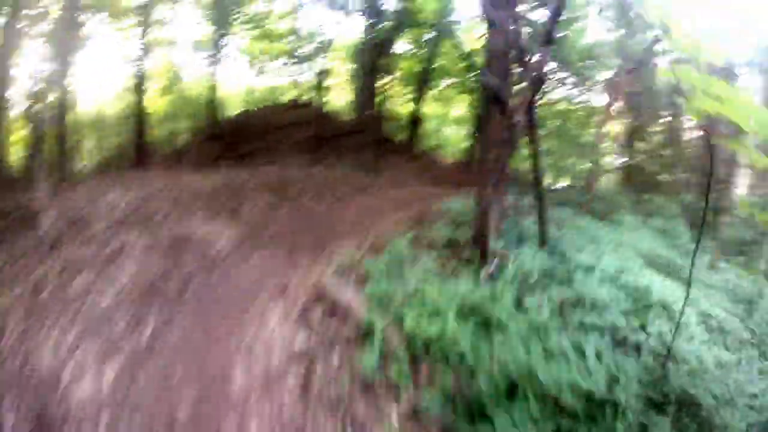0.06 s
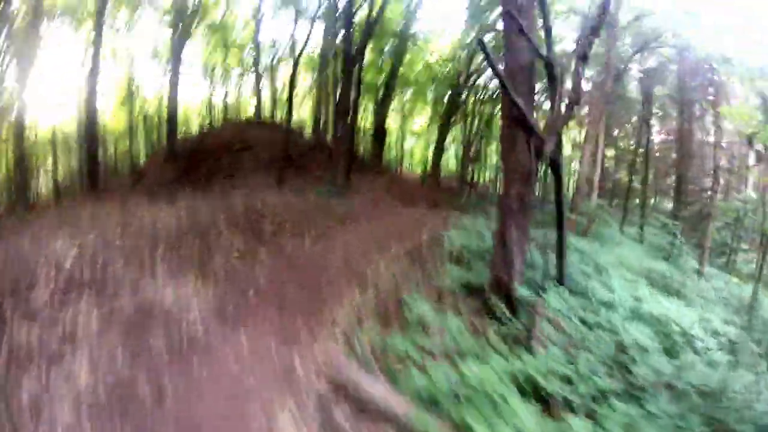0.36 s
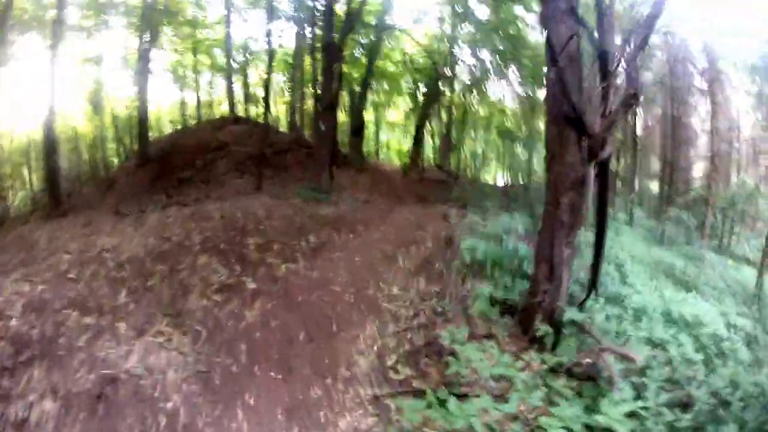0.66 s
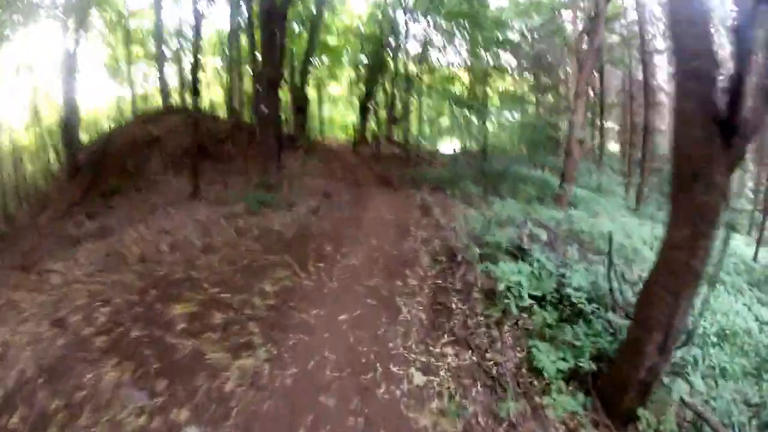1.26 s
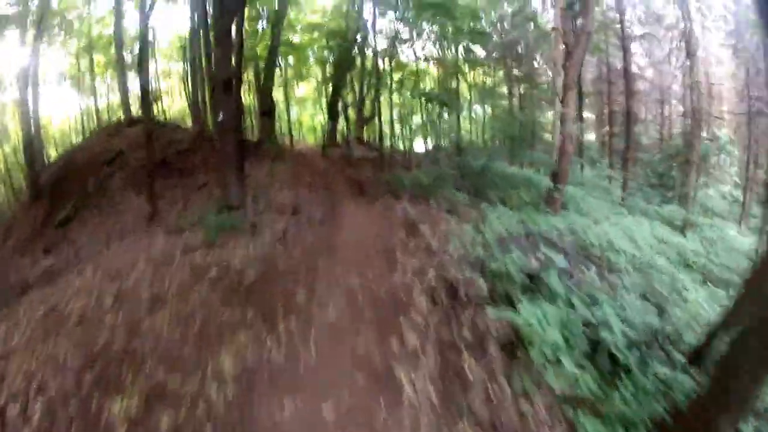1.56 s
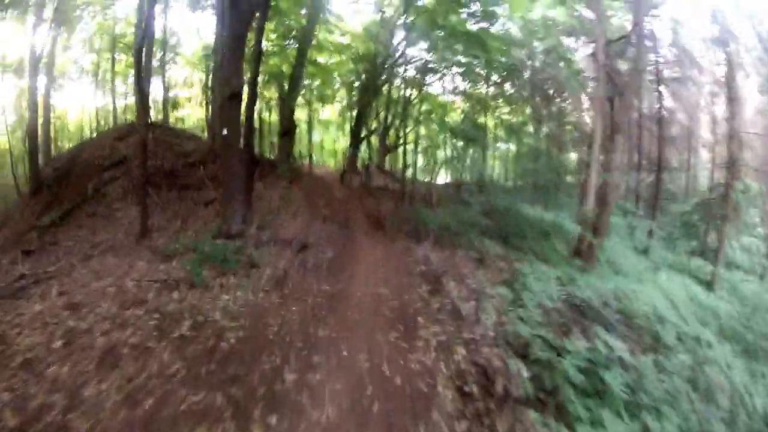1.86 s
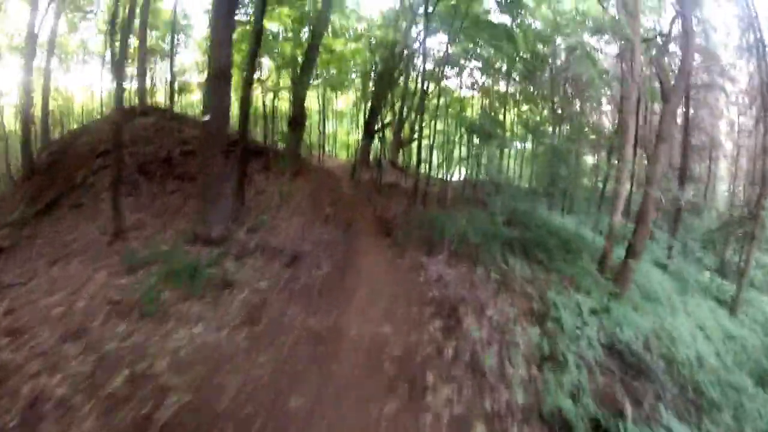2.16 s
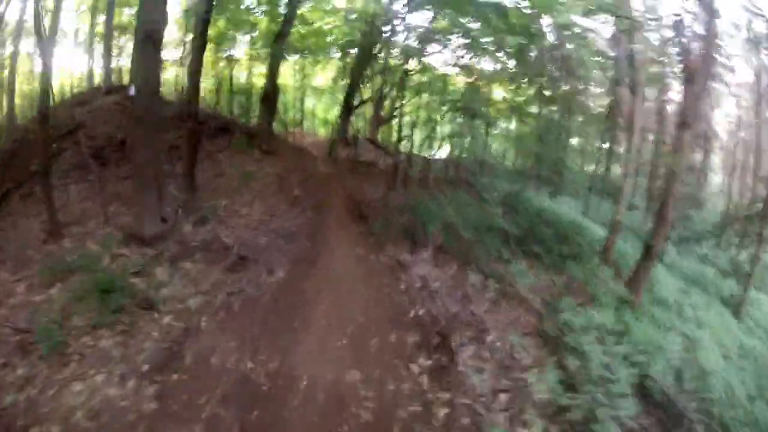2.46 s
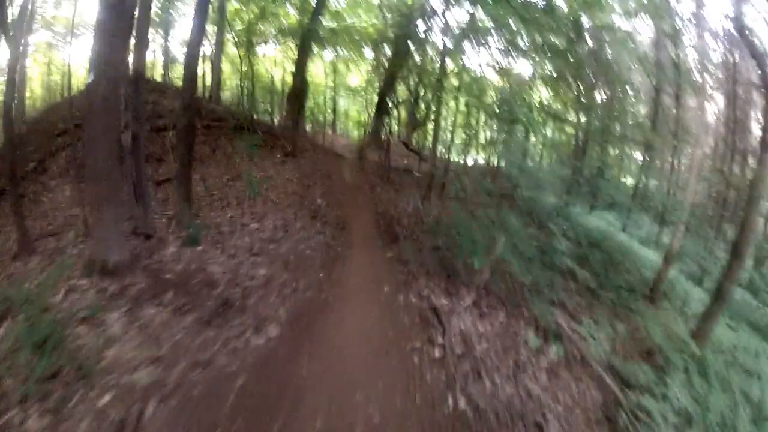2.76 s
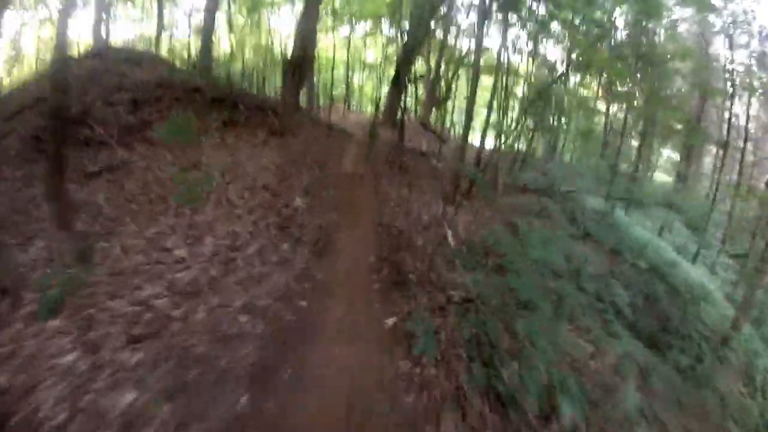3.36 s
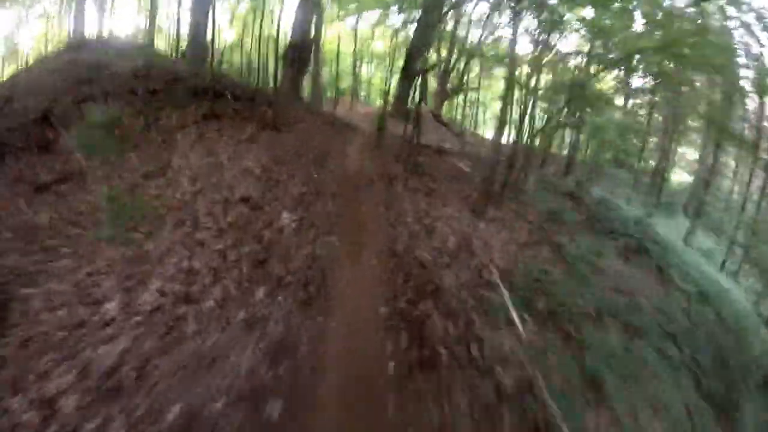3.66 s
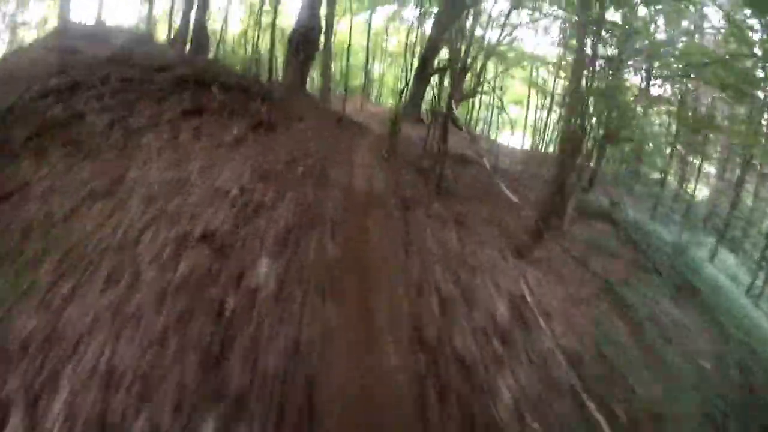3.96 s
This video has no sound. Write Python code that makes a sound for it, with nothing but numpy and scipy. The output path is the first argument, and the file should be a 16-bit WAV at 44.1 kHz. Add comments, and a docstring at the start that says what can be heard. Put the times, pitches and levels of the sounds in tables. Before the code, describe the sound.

Mountain bike rolling down a dirt trail, with wind rumble, crunching tyres and chain rattle.

```python
"""Wind buffets the microphone over a bed of tyre roar: a mountain bike gathering speed down a dirt
forest trail, heard from a camera on the rider. The tyres crunch soil and leaves, slip on grit and snap
twigs, and dull bumps come up through the mount. On top, the slack chain chatters in short bursts and
knocks make the frame clack. The camera's coarse sampling adds a glassy top."""
import sys
import numpy as np
from scipy import signal
from scipy.fft import rfft, irfft
from scipy.io import wavfile

SR = 44100
rng = np.random.default_rng(int(sys.argv[2]) if len(sys.argv) > 2 else 0)


def materialize(psi):
    """Save the field psi as 16-bit PCM at rate SR to the path in sys.argv[1].

    A 1-D psi becomes a single channel; in a 2-D psi each row is a channel.
    """
    bounded = np.clip(np.atleast_2d(psi).T, -1, 1)
    quanta = np.round(bounded * 32767).astype(np.int16)
    wavfile.write(sys.argv[1], SR, quanta)


N = 176400
T = np.arange(N) / SR

# fader ride of the wind on the microphone: t/s, level/dB
WIND_RIDE = [(0.0, -42.5), (0.18, -44), (0.26, -40), (0.32, -48), (0.72, -44), (1.08, -45.5), (1.3, -38),
             (1.35, -48), (1.41, -35.5), (1.46, -47.5), (1.96, -36), (2.12, -43.5), (2.49, -37.5),
             (2.53, -32), (2.75, -46.5), (2.8, -32.5), (2.92, -36.5), (3.2, -34.5), (3.29, -23.5),
             (3.32, -43), (3.34, -30), (3.49, -34), (3.61, -26.5), (3.73, -28.5), (3.97, -24), (4.0, -40)]
# EQ of the wind rumble: f/Hz, level/dB
WIND_EQ = [(15, -14), (25, -1.5), (38, 2.5), (85, 1.5), (130, -1.5), (200, -5.5), (300, -12.5), (450, -22),
           (700, -32), (1000, -67.5), (2000, -59)]
# dull bumps through the rider's mount: t/s, level/dB
MOUNT_BUMPS = [(.062, -36), (.704, -28.5), (2.548, -21), (2.648, -27), (3.274, -29), (3.336, -30),
               (3.606, -26)]
# low body of a bump: f/Hz, level/dB, t60/s
MOUNT_MODES = [(89, -1.5, 0.093), (151, -4.5, 0.018), (254, -3, 0.024)]
# fader ride of the tyre roar: t/s, level/dB
ROAR_RIDE = [(0.0, -53), (0.27, -52), (0.31, -60.5), (0.39, -52.5), (0.68, -52.5), (0.73, -49.5),
             (1.38, -53), (3.63, -44.5), (3.9, -41), (4.0, -46)]
# EQ of tread on packed soil: f/Hz, level/dB
ROAR_EQ = [(100, -14), (300, 0.5), (450, -1.5), (620, 1.5), (720, -4), (850, -11), (1000, -20), (1500, -27),
           (3000, -61)]
# fader ride of soil and leaves under the tyres: t/s, level/dB
CRUNCH_RIDE = [(0, -66), (.22, -62.5), (.33, -62.5), (.7, -66.5), (.77, -59.5), (1.1, -68), (1.45, -62),
               (1.78, -66), (2.03, -59), (2.15, -63.5), (2.72, -58), (3.0, -59.5), (3.24, -59), (3.42, -61),
               (3.49, -57), (3.73, -52.5), (4, -60)]
# EQ of the crunch: f/Hz, level/dB
CRUNCH_EQ = [(400, -3), (1000, 1.5), (1700, -1), (2250, -0.5), (2700, 0), (3200, 1), (3800, -3),
             (4700, -5.5), (5800, -10.5)]
# metal parts shaken by rough ground: f/Hz, level/dB, t60/s
METAL_MODES = [(2185, -1.5, 0.038), (2363, 2, 0.022), (3290, -4, 0.049)]
# stones and twigs snapping: t/s, level/dB
SNAP_HITS = [(2.363, -40.5), (2.657, -53), (2.892, -43), (2.954, -58), (3.104, -39.5), (3.735, -38)]
# EQ of a snap: f/Hz, level/dB
SNAP_EQ = [(300, -16), (800, 11.5), (1400, -2), (2300, -4), (4000, -22), (6000, -22)]
# tyre slips on grit, cued at their peaks: t/s, level/dB, half length/s
SLIPS = [(0.256, -55.5, 0.019), (0.425, -56, 0.023), (3.681, -45, 0.01)]
# EQ of a slip: f/Hz, level/dB
SLIP_EQ = [(800, -9), (1700, -0.5), (2500, 4.5), (3300, -2.5), (4400, -3.5), (5800, -12)]
# bursts of chain chatter: t/s, level/dB, length/s
CHAIN_BURSTS = [(.062, -47, 0.0066), (.166, -53, .003), (.243, -45.5, 0.023), (.420, -44.5, 0.0048),
                (.482, -49, 0.0025), (.560, -57, 0.0029), (.636, -52, .003), (.665, -50.5, .003),
                (.733, -45, 0.0092), (1.183, -52.5, .01), (1.231, -43.5, 0.0055), (1.280, -36.5, 0.0021),
                (1.2867, -45.5, 0.0051), (1.659, -46.5, .007), (1.698, -40, 0.018), (1.840, -46.5, .004),
                (1.851, -61, .01), (1.875, -45, 0.012), (1.967, -45, 0.0063), (1.986, -45, 0.005),
                (1.997, -45, 0.012), (2.206, -40, 0.0067), (2.302, -43, .029), (2.503, -41, 0.007),
                (2.567, -32.5, 0.006), (2.574, -37.5, 0.021), (2.798, -40.5, 0.016), (2.870, -41, 0.026),
                (3.092, -36, 0.01), (3.134, -37.5, 0.027), (3.211, -46, 0.0068), (3.220, -41, 0.011),
                (3.294, -40, 0.0052), (3.330, -37.5, .018), (3.514, -33.5, 0.013), (3.574, -44, 0.013),
                (3.587, -43.5, 0.0072), (3.631, -32.5, 0.014), (3.807, -40, 0.0095), (3.859, -40, .006),
                (3.866, -39.5, 0.0091), (3.919, -34.5, 0.012)]
# ring of the chain links: f/Hz, level/dB, t60/s
LINK_MODES = [(2840, -2.5, 0.0024), (3300, -16, 0.0035), (3907, -4, 0.017), (4635, 3, 0.0044),
              (5160, -4, 0.0033)]
# knocks in the frame: t/s, level/dB, low-pass f/Hz
FRAME_KNOCKS = [(.370, -45, 2000), (.724, -43.5, 1900), (0.771, -43.5, 1890), (2.461, -32, 2860),
                (2.5534, -17.5, 5000), (3.243, -41, 2300), (3.477, -46, 4000), (3.671, -54, 4500),
                (3.751, -36, 4030)]
# ring of the frame: f/Hz, level/dB, t60/s
CLACK_MODES = [(1300, -24.5, 0.031), (2050, 0.5, 0.012), (2776, 1.5, 0.011), (3680, -12.5, 0.027),
               (5150, -5, 0.0066)]

WIND_TRIM_DB, ROAR_TRIM_DB, CHAIN_TRIM_DB, CLACK_TRIM_DB = 0.11, 1.5, -1, 3.5
GUST_DB, GUSTS_PER_S = 1.35, 50
BRIGHT_HZ, BRIGHT_PER_DB, WIND_REF_DB = 108, 0.115, -45.5  # high shelf that follows the wind's strength
GRAINS_PER_S, GRAIN_SPREAD_DB, GRAIN_DB, HISS_DB, TINGLE_DB = 1500, 3, -4, -1.5, -73
CHAIN_REBOUND_DB, CHAIN_VARY_DB = -1.5, 1.5
FRAME_REBOUND_S, FRAME_REBOUND_DB = .0048, -7
FRAME_LOW_HZ, CHAIN_LOW_HZ = 1200, 1920  # small parts radiate little below these
SHIMMER_HZ, SHIMMER_WIDTH_HZ, SHIMMER_T60_S, SHIMMER_DB = 2990, 260, 0.5, -28
MIC_LOW_HZ, CEILING_DB, INPUT_EDGE_HZ, HOLD_HZ, TOP_HZ = 30.6, -14.5, 5520, 12000, 15350


def undb(db):
    """Decibels to gain."""
    return 10 ** (np.asarray(db) / 20)


def unit(x):
    """Scale to rms 1."""
    return x / np.sqrt(np.mean(x ** 2))


def curve(rows):
    """Join (time, value) breakpoints with straight ramps."""
    return np.interp(T, *np.array(rows).T)


def cut(x, hz, kind, order=2):
    """Low-pass or high-pass."""
    return signal.sosfilt(signal.butter(order, hz, kind, fs=SR, output="sos"), x)


def colour(x, eq):
    """Shape a sound with an EQ curve, at rms 1."""
    hz, db = np.array(eq).T
    f = np.maximum(np.fft.rfftfreq(N, 1 / SR), 1)
    gain = undb(np.interp(np.log(f), np.log(hz), db))
    return unit(irfft(rfft(x) * gain, N))


def noise(eq):
    """White noise through an EQ curve."""
    return colour(rng.standard_normal(N), eq)


def wobble(per_s):
    """Random modulator at rms 1, ramping to a new value per_s times a second."""
    knots = rng.standard_normal(2048)
    return unit(np.interp(T * per_s, np.arange(len(knots)), knots))


def ring(x, modes, rise_s=1 / SR):
    """Strike a body of decaying modes; rise_s softens the attack as the blow spreads."""
    t = T[:SR // 4]
    body = sum(undb(db - 60 * t / t60) * np.sin(2 * np.pi * hz * t) for hz, db, t60 in modes)
    return signal.fftconvolve(x, body * (1 - np.exp(-t / rise_s)))[:N]


def blows(cues):
    """One impulse per cue, at its time and level."""
    out = np.zeros(N)
    for start, db, *_ in cues:
        out[int(np.clip(start * SR, 0, N - 1))] += undb(db)
    return out


def rebounds(bursts, gap_s, fall_db, scatter_db):
    """After each blow a loose part bounces unevenly, weaker and weaker, until it settles."""
    out = np.zeros(N)
    for start, db, length in bursts:
        timing, polarity, force = rng.standard_normal((3, 40))
        delay = np.cumsum(gap_s * np.exp(timing / 2))
        settle = np.clip((length - delay) / gap_s + 1, 0, 1)
        level_db = db - fall_db * delay / length + scatter_db * np.tanh(force)
        at = np.clip((start + delay) * SR, 0, N - 1).astype(int)
        np.add.at(out, at, settle * np.sign(polarity) * undb(level_db))
    return out


def wind():
    """Eddies on the microphone: a fluttering rumble that opens up as it gets stronger."""
    strength_db = curve(WIND_RIDE)
    air = noise(WIND_EQ) * unit(undb(GUST_DB * wobble(GUSTS_PER_S)))
    low = signal.sosfiltfilt(signal.butter(2, BRIGHT_HZ, fs=SR, output="sos"), air)
    shelf = undb(BRIGHT_PER_DB * (strength_db - WIND_REF_DB))
    return (low + (air - low) * shelf) * undb(strength_db + WIND_TRIM_DB)


def bumps():
    """Jolts come through the rider's mount as low thuds."""
    return ring(blows(MOUNT_BUMPS), MOUNT_MODES)


def tyres():
    """Tread roars on packed soil and crushes grit and leaves; the grains set metal parts tingling."""
    roar = noise(ROAR_EQ) * undb(curve(ROAR_RIDE) + ROAR_TRIM_DB)
    clicks = (rng.random(N) < GRAINS_PER_S / SR) * rng.choice([-1, 1], N)
    grains = clicks * undb(GRAIN_SPREAD_DB * np.minimum(rng.exponential(size=N), 5))
    crunch = undb(GRAIN_DB) * colour(grains, CRUNCH_EQ) + undb(HISS_DB) * noise(CRUNCH_EQ)
    crunch_db = curve(CRUNCH_RIDE) + 1.06 * wobble(per_s=22.11)
    tingle = unit(cut(ring(grains, METAL_MODES), FRAME_LOW_HZ, "high"))
    return roar + undb(crunch_db) * crunch + undb(TINGLE_DB) * tingle


def snaps(t60_s=0.029):
    """Stones and twigs snap under a tyre: noise with a hard attack and a tight tail."""
    tail = undb(-60 * T[:SR // 4] / t60_s)
    return signal.fftconvolve(blows(SNAP_HITS), tail)[:N] * noise(SNAP_EQ)


def slips():
    """Short gritty swells where a tyre loses grip."""
    swells = sum(undb(db) * np.exp(-((T - peak) / half) ** 2) for peak, db, half in SLIPS)
    return swells * noise(SLIP_EQ) * undb(1.54 * wobble(per_s=400))


def chain():
    """The slack chain flicks against metal and bounces; each contact point favours other modes."""
    bounces = rebounds(CHAIN_BURSTS, gap_s=.0017, fall_db=5.5, scatter_db=6)
    hits = blows(CHAIN_BURSTS) + undb(CHAIN_REBOUND_DB) * bounces
    links = sum(ring(hits * undb(CHAIN_VARY_DB * wobble(per_s=60)), [mode]) for mode in LINK_MODES)
    return undb(CHAIN_TRIM_DB) * cut(links, CHAIN_LOW_HZ, "high")


def frame():
    """A loose part hits the frame in a quick flam, duller on soft contact; metal shimmers on after it."""
    hits = np.zeros(N)
    for start, db, bright_hz in FRAME_KNOCKS:
        flam = blows([(start, db), (start + FRAME_REBOUND_S, db + FRAME_REBOUND_DB)])
        hits += cut(flam, bright_hz, "low")
    clacks = cut(ring(hits, CLACK_MODES, rise_s=0.00053), FRAME_LOW_HZ, "high", order=4)
    band = signal.iirpeak(SHIMMER_HZ, SHIMMER_HZ / SHIMMER_WIDTH_HZ, fs=SR)
    metal = unit(signal.lfilter(*band, rng.standard_normal(N)))
    tail = metal * undb(-60 * T / SHIMMER_T60_S)
    shimmer = signal.fftconvolve(blows(FRAME_KNOCKS), tail)[:N]
    return undb(CLACK_TRIM_DB) * clacks + undb(SHIMMER_DB) * shimmer


def scene():
    """A mono mix, everything close and dry."""
    return (wind() + bumps() + tyres() + snaps() + slips() + chain() + frame())[None]


def record(dry):
    """The camera soft-clips, samples coarsely and holds each value, mirroring the sound into the treble."""
    mic = cut(dry, MIC_LOW_HZ, "high")
    clipped = mic / (1 + (mic / undb(CEILING_DB)) ** 8) ** (1 / 8)
    f = np.fft.rfftfreq(N, 1 / SR)
    band_limited = irfft(rfft(clipped) / np.sqrt(1 + (f / INPUT_EDGE_HZ) ** 40), N)
    coarse = signal.resample(band_limited, N * HOLD_HZ // SR, axis=-1)
    steps = np.repeat(coarse, 4, axis=-1)
    glassy = signal.resample(steps, N, axis=-1)
    return signal.sosfilt(signal.ellip(8, .2, 70, TOP_HZ, fs=SR, output="sos"), glassy)


dry = scene()
out = record(dry)
materialize(out)
```